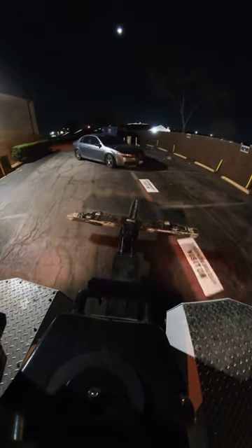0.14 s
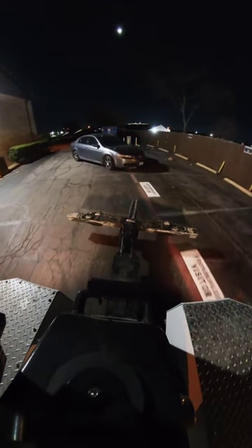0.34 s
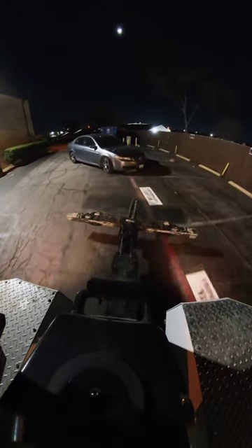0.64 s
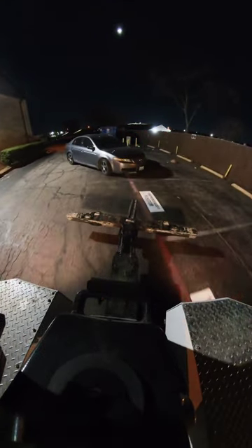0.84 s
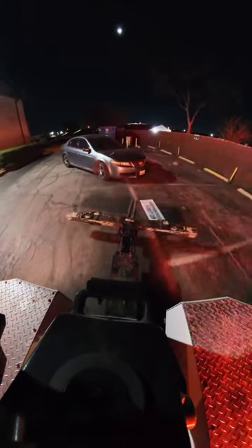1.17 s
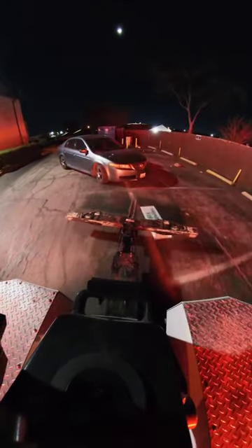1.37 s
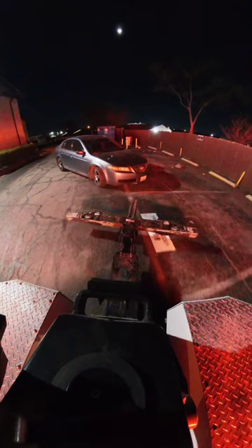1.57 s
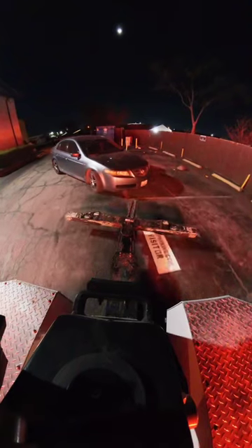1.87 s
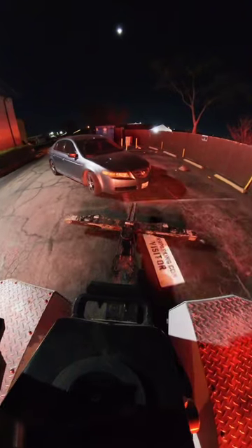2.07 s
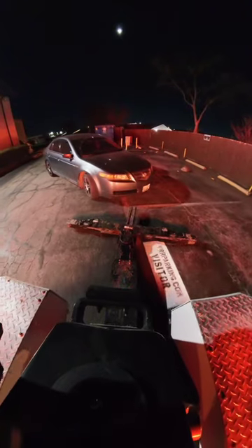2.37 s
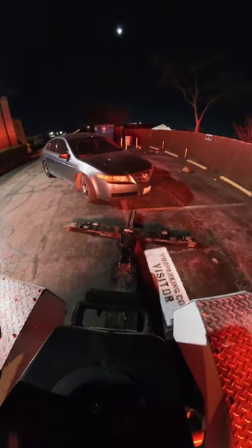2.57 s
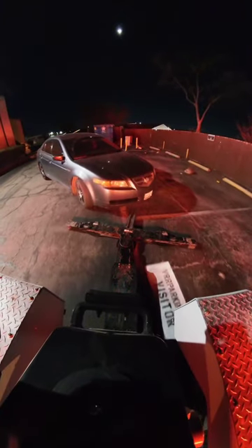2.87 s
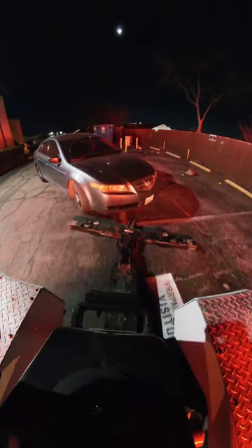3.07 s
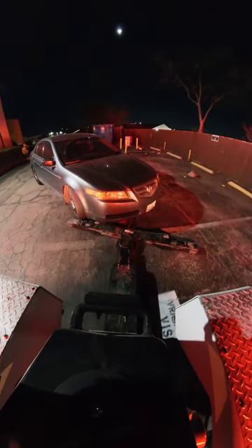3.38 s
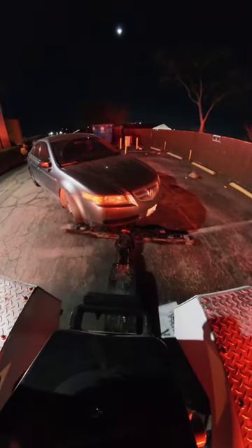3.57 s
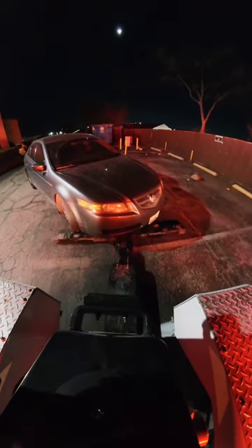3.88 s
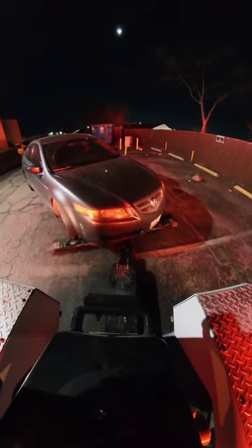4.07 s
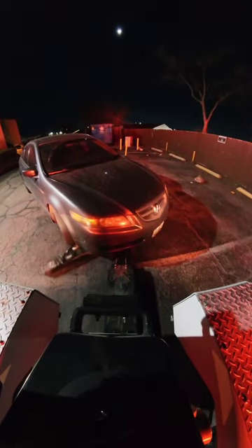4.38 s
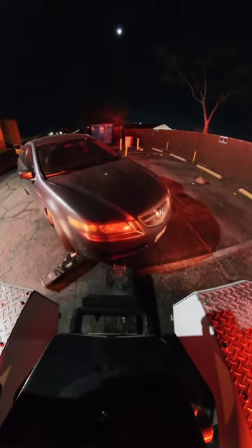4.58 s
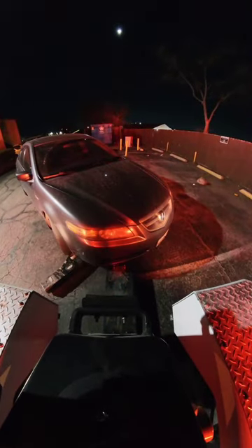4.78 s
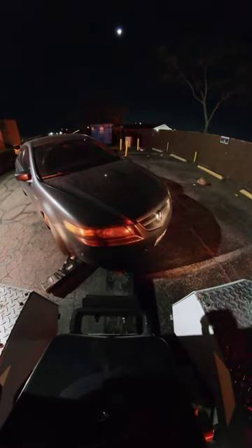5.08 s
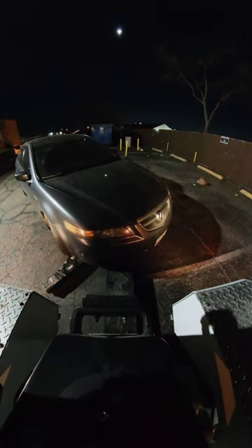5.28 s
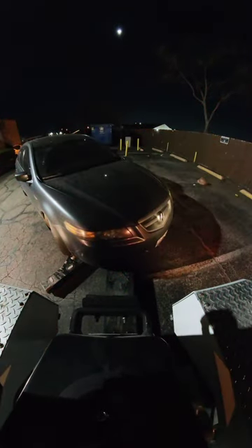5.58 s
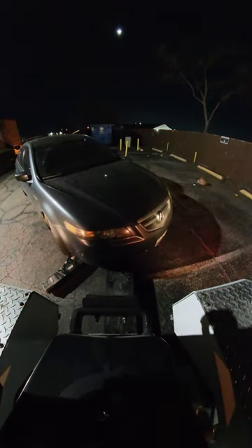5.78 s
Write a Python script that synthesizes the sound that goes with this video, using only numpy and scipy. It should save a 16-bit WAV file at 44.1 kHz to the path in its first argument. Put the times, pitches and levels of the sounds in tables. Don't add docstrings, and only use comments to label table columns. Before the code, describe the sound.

A diesel tow truck backs up in an outdoor lot at night, heard close from its rear deck, dull and nearly mono. From 0 to 1.9 s there is mostly a steady throbbing idle, low rumble and soft clatter, with tiny valve spits near 1.3 and 1.5 s. At 2.0 s a hydraulic pump bites in with a low buzzing drone, sagging then steadying, over faint scraping, until about 2.75 s, when a hard steel clunk rings out. From 2.9 to 3.7 s the engine lines sink and the arm scrapes, knocks and shakes the deck in low booms, with short hisses. Strong clanks land near 4.05, 4.55 and 4.95 s among grinding drags and spitting valves. Around 5.2 s a hiss with a thin whistle swells; at 5.58 s a clank and bright, loud hydraulic burst lead into a rising pump whine and stronger engine, ending abruptly at about 5.9 s.

```python
import sys
import numpy as np
from scipy import signal
from scipy.fft import rfft, irfft, next_fast_len
from scipy.io import wavfile
from scipy.ndimage import uniform_filter1d, minimum_filter1d, map_coordinates

SR = 44100
rng = np.random.default_rng(int(sys.argv[2]) if len(sys.argv) > 2 else 0)


def to_wav(s):
    ch = np.atleast_2d(s).T
    pcm = np.round(np.clip(ch, -1, 1) * 32767)
    wavfile.write(sys.argv[1], SR, pcm.astype(np.int16))


def undo_db(level):
    steps = np.asarray(level, float) / 20
    return 10 ** steps


N = 261513

# time_s,
# change_db
SWELLS = [(0, -1.5), (1.9, 1.5), (2.65, 2), (2.8, -3), (3.06, -3.5), (3.35, 6.5), (3.5, -4.5), (3.68, -6),
          (3.93, -2), (4.1, -12), (4.34, -4.5), (4.56, 3), (4.64, 1), (4.82, 9), (5.0, -12), (5.24, -2.5),
          (5.53, 3), (5.93, 0)]
# time_s, level_db
ROLL = [
    (0, -1),
    (2.7, -1.5),
    (2.85, -5.5),
    (5.4, -6.5),
    (5.6, 4.5),
    (5.93, 5),
]
# frequency_hz, density_db
MIDS = [(470, -19.5), (800, -4.5), (987, -5), (1180, -6), (1820, -13), (2060, -12.5), (2520, -16),
        (3270, -18), (3620, -27.5), (4500, -23.5), (5850, -40), (9900, -120)]


def unit(x):
    return x / np.sqrt(np.mean(x ** 2) + 1e-20)


def along(points, hz):
    f, v = np.transpose(points)
    return np.interp(np.log(hz + 1), np.log(f + 1), v)


def curves(rows):
    s, *columns = np.transpose(rows)
    return [np.interp(np.arange(N) / SR, s, column) for column in columns]


def gate(rows, edge_s=0.0028):
    t = np.arange(N) / SR
    inside_s = np.minimum(t - rows[0][0], rows[-1][0] - t)
    return np.clip(inside_s / edge_s + 1, 0, 1)


def wobble(rate):
    coarse = np.arange(0, N + 16, 16)
    knots = rng.standard_normal(int(N * rate / SR) + 4)
    smooth = map_coordinates(knots, [coarse * rate / SR])
    return unit(np.interp(np.arange(N), coarse, smooth))


def bursts(rows, rise_db_s, fall_db_s):
    t = np.arange(0, N + 64, 64) / SR
    s, held, db = np.transpose(rows)[..., None]
    early_s, late_s = np.maximum(s - t, 0), np.maximum(t - s - held, 0)
    level_db = db - rise_db_s * early_s - fall_db_s * late_s
    return np.interp(np.arange(N) / SR, t, np.linalg.norm(undo_db(level_db), axis=0))


def filtered(x, response):
    m = next_fast_len(len(x) + SR // 5)
    return irfft(rfft(x, m) * response(np.fft.rfftfreq(m, 1 / SR)), m)[:len(x)]


def resonances(modes):
    def response(f):
        total = 0
        for k, (centre, width, db) in enumerate(modes):
            damping = 1j * f * width
            total = total + (-1) ** k * undo_db(db) * damping / (centre * centre - f * f + damping)
        return total
    return response


def soft(hz, corner_hz):
    return 1 / (1 + 1j * hz / corner_hz) ** 3


def rush(spectrum, patchy_db):
    z = signal.stft(rng.standard_normal(N), nperseg=512)[2]
    field = uniform_filter1d(rng.standard_normal(z.shape), size=5, axis=0)
    field = uniform_filter1d(field, size=8, axis=1)
    x = signal.istft(z * undo_db(patchy_db * unit(field)), nperseg=512)[1][:N]
    return unit(filtered(x, lambda hz: undo_db(along(spectrum, hz))))


def tone(hz, order=1, drift=0):
    return np.sqrt(2) * np.sin(order * 2 * np.pi * np.cumsum(hz) / SR + drift)


def engine():
    # frequency_hz, density_db
    low_spectrum = [(13, -62.5), (22, -10.5), (81, -4), (130, -7.5), (212, -12.5), (360, -27), (408, -11),
                    (447, -25.5), (523, -30.5), (900, -35.5), (1170, -60), (1980, -120)]
    # frequency_hz, width_hz, level_db
    panel_modes = [(212, 1.1, -14.5), (265.2, 9.6, -3), (386, 18, -15.5), (416, 12, -6), (533, 71, -11.5)]
    # frequency_hz, width_hz, level_db
    casting_modes = [(1244, 310, 1.5), (1587, 260, 2.5), (3240, 83, -17), (4100, 110, -23.5),
                     (6840, 180, -23)]
    firing_hz = 35.3
    swell_db, = curves(SWELLS)
    engine_db, clatter_db = -39.5 + 0.95 * swell_db, -47 + 0.72 * swell_db

    firings = np.cumsum(firing_hz * (1 + 0.00643 * wobble(3))) / SR
    fires = np.flatnonzero(np.diff(np.floor(firings)))
    pulses = np.zeros(N)
    pulses[fires] = undo_db(0.5 * rng.standard_normal(N)[:len(fires)])
    exhaust = unit(filtered(pulses, lambda hz: undo_db(along(low_spectrum, hz)) * (hz > 90) * (hz < 450)))
    beat = 1 + 0.08 * np.cos(2 * np.pi * firings)
    roar = rush(low_spectrum, patchy_db=1.0) * beat
    low = undo_db(engine_db + 4.0 + 0.9 * wobble(12)) * (roar + 0.5 * exhaust)

    panels = unit(filtered(rng.standard_normal(N), resonances(panel_modes)))
    panel_db = -46.0 + 0.68 * np.minimum(curves(ROLL)[0], 0) + 3.0 * wobble(7)
    casting = unit(filtered(rng.standard_normal(N), resonances(casting_modes)))
    clatter = (rush(MIDS, patchy_db=1.85) + 0.5 * casting) * beat
    return low + undo_db(panel_db) * panels + undo_db(clatter_db - 2.0 + 0.26 * wobble(23)) * clatter


def hum():
    # frequency_hz, level_db
    order_lines = [(107, -44.5), (140.5, -44.5), (177, -49), (211, -51.5), (258.4, -54.5), (414, -47),
                   (532, -62.5)]
    lines = 0
    for hz, db in order_lines:
        breath = undo_db(db + 4.0 * wobble(3.7))
        lines = lines + breath * tone(np.full(N, hz), drift=0.6 * wobble(4.5))
    return undo_db(curves(ROLL)[0]) * lines


def pump():
    # time_s, pitch_hz, level_db, second_order_db
    drone = [
        (1.99, 166, -39.5, -0.5),
        (2.04, 156, -32.5, 2),
        (2.14, 146.5, -33, -1.5),
        (2.228, 148.1, -34, 1.5),
        (2.3, 152, -30.5, 3),
        (2.47, 153, -32, 4.5),
        (2.53, 151, -30, -9.5),
        (2.65, 152.6, -31, -0.5),
        (2.75, 154.3, -32, 2),
    ]
    # time_s, pitch_hz, level_db, second_order_db
    spin_up = [
        (5.659, 133.6, -38, 0),
        (5.714, 146.4, -30.5, -2),
        (5.815, 147.1, -37, 2.5),
        (5.856, 165.7, -32, 3),
        (5.9, 168.8, -33, 3.5),
        (5.93, 170.5, -31, 7.5),
    ]
    tooth_db = [2, -12.5, -12.5, -13.5, -23.5]
    lift_tooth_db = [-3.5, 1.5, 3, -3, 0]
    tank_hz, tank_width_hz, tank_db = 330, 37, 13
    total, shake = 0, 0.03 * wobble(30)
    hz, level_db, second_db = curves(drone + spin_up)
    drone_on, lift_on = gate(drone), gate(spin_up)
    for k, db in enumerate(tooth_db):
        order = k + 1
        lift_db = tank_db / (1 + ((order * hz - tank_hz) / tank_width_hz) ** 2)
        flutter_db = (2.2 if order > 2 else 0.8) * wobble(8.89)
        order_db = level_db + db + lift_tooth_db[k] * lift_on + lift_db + flutter_db
        order_db = order_db + second_db * (order == 2)
        total = total + undo_db(order_db) * tone(hz, order=order, drift=order * shake + np.pi / 2)
    return (drone_on + lift_on) * total


def valves():
    # start_s, held_s, flow_db
    openings = [(1.28, 0.022, -58), (1.465, 0.011, -51.5), (2.005, 0.023, -46), (2.15, 0.64, -64.5),
                (2.47, 0.021, -62), (2.805, 0.0072, -52), (2.985, 0.074, -61.5), (3.12, 0.38, -61.5),
                (3.58, 0.015, -54), (3.65, 0.15, -61), (3.9, 0.17, -58.5), (4.042, 0.0036, -45),
                (4.15, 0.01, -58.5), (4.255, 0.035, -54.5), (4.388, 0.011, -45.5), (4.43, 0.12, -59),
                (4.69, 0.21, -57.5), (4.962, 0.064, -47.5), (5.2, 0.031, -50), (5.217, 0.11, -44),
                (5.465, 0.053, -45), (5.577, 0.011, -37.5), (5.6, 0.13, -42.5), (5.78, .2, -40)]
    # frequency_hz, density_db
    jet_spectrum = [(530, -28), (900, 5), (1740, -3.5), (2090, -7), (2420, -1.5), (3200, -8.5),
                    (3740, -5.5), (5460, -6), (5900, -9), (6430, -6), (7730, -13.5), (8690, -26.5),
                    (9120, -20.5), (11900, -58), (20100, -120)]
    # frequency_hz, density_db
    edge_spectrum = [(6600, -30), (7300, -3), (8000, 0), (8600, -3), (9300, -4), (9700, -40)]
    # frequency_hz, width_hz, level_db
    hose_modes = [(1810, 85, -3.5), (2400, 53, -8.5), (3300, 570, -6), (3970, 47, -2.5), (5030, 80, -5.5),
                  (5820, 170, 8), (6270, 31, 0.5)]
    # start_s, held_s, level_db
    whistles = [(2.875, .085, -57), (3.685, .125, -55.5), (5.21, .125, -46), (5.608, .03, -36.5),
                (5.67, .11, -52), (5.68, .09, -61), (3.18, .13, -66), (4.25, .049, -58), (5.29, .04, -51),
                (5.49, .03, -57), (5.5, .034, -58), (5.68, .1, -52.5), (5.81, .04, -51), (3.11, .043, -63),
                (3.15, .09, -66), (2.2, .5, -66.5), (5.215, .1, -52), (5.65, .015, -51), (5.575, .03, -47),
                (5.7, .08, -52), (5.8, .13, -51), (5.84, .06, -53), (3.29, .04, -65), (3.3, .06, -64),
                (3.44, .025, -57), (3.72, .27, -58), (5.22, .04, -51), (5.76, .03, -50), (5.6, .05, -51),
                (4.54, .05, -63), (4.53, .03, -58), (4.975, .015, -54), (5.205, .02, -56), (5.82, .06, -58),
                (5.575, .02, -46), (5.505, .04, -56), (5.9, .03, -49), (5.47, .04, -59)]
    # pitch_hz, wander_hz
    gaps = [(4165, 37), (4160, 37), (5830, 95), (6760, 110), (7555, 65), (8450, 60), (6720, 60), (1830, 40),
            (3340, 70), (6400, 90), (4200, 70), (2400, 40), (4300, 60), (3450, 70), (4050, 70), (4950, 170),
            (6300, 110), (6850, 70), (4800, 120), (3650, 70), (5850, 90), (5000, 110), (5800, 50),
            (3250, 60), (2450, 90), (1600, 45), (3400, 120), (5050, 130), (7300, 120), (4020, 40),
            (3330, 50), (3400, 90), (4600, 70), (7550, 80), (5050, 110), (6450, 110), (5950, 130),
            (7400, 100)]
    # start_s, peak_db, colour_hz
    spits = [(1.2694, -57, 3230), (1.466, -38.5, 2900), (2.0123, -48, 3780), (3.0194, -51, 2800),
             (3.3902, -39, 2740), (4.147, -49, 5900), (4.7, -48, 2900), (4.2894, -47.5, 4320),
             (4.3964, -32.5, 5900), (5.3094, -47, 7750), (2.78, -37.5, 2800), (3.3, -44, 6200),
             (3.595, -47, 5900), (3.278, -43, 3300), (5.575, -29, 6100), (5.47, -37, 5100),
             (4.043, -34, 3440), (4.043, -45, 5200)]
    leak = undo_db(-63 + 0.53 * curves(SWELLS)[0] + 1.5 * wobble(12))
    opened = bursts(openings, rise_db_s=1403.5, fall_db_s=425.5)
    flow_db = 20 * np.log10(np.hypot(leak, opened))
    jet = rush(jet_spectrum, patchy_db=2.3)
    hose = unit(filtered(jet, resonances(hose_modes)))
    sputter_db = 1.3 * wobble(45)
    hiss = undo_db(flow_db + 0.2 + sputter_db) * (jet + 0.44 * hose)
    edge_db = -50.0 + 3.5 * (np.minimum(flow_db, -41) + 40.5)
    hiss = hiss + undo_db(edge_db) * rush(edge_spectrum, patchy_db=2.5)

    wander, flutter = wobble(480), wobble(130)
    for row, (hz, wander_hz) in zip(whistles, gaps):
        rise, fall = (520, 300) if wander_hz < 38 else (1100, 520)
        span = slice(round((row[0] - 0.06) * SR), round((row[0] + row[1] + 0.15) * SR))
        swell = bursts([row], rise, fall) * undo_db(2.7 * flutter)
        hiss[span] += swell[span] * tone(hz + wander_hz * wander[span])

    t = np.arange(SR // 20) / SR
    for s, db, hz in spits:
        puff = unit(filtered(rng.standard_normal(len(t)), resonances([(hz, 220, 0)])))
        decay = undo_db(db - 7.5 - 60 * t / 0.098) * (1 - np.exp(-t / 0.0012))
        hiss[round(s * SR):][:len(t)] += decay * puff
    return hiss


def boom():
    # start_s, peak_db, low_ring_hz, brightness_db, t60_s
    clunks = [(1.98, -25.5, 347, -14, 0.16), (2.328, -24, 404, -31, 0.13), (2.7623, 5, 504, -38, 0.012),
              (2.766, -13.5, 477, -19, 0.068), (2.801, -9.5, 361, -24, 0.085),
              (2.944, -31, 311, -36, 0.053), (3.278, -11.5, 473, -28, 0.09), (3.303, -19, 465, -36, 0.17),
              (3.389, -11.5, 344, -26, 0.057), (3.572, -17.5, 334, -38.5, 0.1),
              (3.71, -19.5, 395, -21, 0.095), (4.0398, -5.5, 473.6, -20, 0.13),
              (4.398, -21.5, 358, -12.5, 0.16), (4.55, -18, 340, -33, 0.083),
              (4.5672, -8, 502.4, -32, 0.15), (4.587, -28, 520, -34, 0.21), (4.763, -19.5, 386, -27, 0.071),
              (4.951, -6.5, 437, -26.5, 0.086), (5.464, -19, 328, -13, 0.16),
              (5.575, -12.5, 348, -9.5, 0.12), (2.809, -14, 499, -26, 0.17), (3.246, -19.5, 486, -20, 0.16),
              (3.33, -26, 450, -36, 0.11), (3.435, -20, 300, -19, 0.1), (2.792, -13, 404, -28, 0.052),
              (4.705, -19, 191, -20, 0.1), (4.87, -21, 404, -13, 0.038), (4.45, -20, 404, -21, 0.17)]
    # frequency_hz, width_hz, level_db
    arm_modes = [(186, 38, -7), (270, 34, -8.5), (311, 55, -6.5), (473, 23, -0.5), (679, 54, -6.5),
                 (932, 47, -14.5), (1440, 67, -22), (1670, 29, -14.5)]
    out, t = np.zeros(N + SR), np.arange(SR // 4) / SR
    for s, db, low_hz, bright_db, t60 in clunks:
        fall = undo_db(-60 * np.maximum(t - 0.14 * t60, 0) / t60) * (1 - np.exp(-t / 0.0017))
        changes = rng.standard_normal((len(arm_modes), 2))
        modes = [(hz * (1 + 0.021 * a), width, level + 2.4 * b)
                 for (hz, width, level), (a, b) in zip(arm_modes, changes)]
        crunch = filtered(rng.standard_normal(len(t)), resonances(modes))
        crunch = crunch / np.sqrt(np.sum((crunch * fall) ** 2) / np.sum(fall ** 2))

        high_hz = 677 * (1 + 0.49 * (modes[4][0] / arm_modes[4][0] - 1))
        ringing = np.sin(2 * np.pi * low_hz * t) + 0.19 * np.sin(2 * np.pi * high_hz * t)
        ringing = ringing + 0.27 * np.sin(2 * np.pi * 160 * t)
        blow = -np.sin(2 * np.pi * 520 * t) * undo_db(-60 * t / 0.005) * (1 - np.exp(-t / 0.0005))
        blow = blow * 2.7 * undo_db(min(0.4 * (db + 8), 0))
        scuff = unit(filtered(rng.standard_normal(len(t)), lambda f: undo_db(along(MIDS, f)) * (f > 1000)))
        struck = fall * (0.55 * crunch + 0.88 * ringing) + 2.24 * blow
        steel = filtered(struck, lambda f: soft(f, corner_hz=1700))
        out[round(s * SR):][:len(t)] += undo_db(db - 11) * (steel + undo_db(bright_db + 0.5) * fall * scuff)
    return out[:N]


def rings():
    # start_s, pitch_hz, level_db, t60_s
    struck_modes = [(2.7638, 480, -11, 0.069), (2.7634, 658, -17.5, 0.072), (2.7634, 915, -22.5, 0.053),
                    (2.803, 373, -13, .045), (2.7634, 1180, -36, 0.029), (2.804, 532, -20, 0.12),
                    (2.803, 740, -21, 0.088), (2.804, 1560, -41, .07), (3.27, 525, -26, .15),
                    (3.3, 338, -27, .2), (3.42, 290, -27, .12), (3.88, 454, -31.5, 0.17),
                    (3.94, 670, -38, .15), (3.82, 1140, -46, .12), (5.577, 1000, -31, .08),
                    (5.577, 1290, -28, .07), (5.577, 1560, -38, .07), (5.577, 1930, -38, 0.058),
                    (5.577, 2340, -35.5, 0.072), (5.605, 2020, -38, .08), (5.7, 722, -34, .3),
                    (3.39, 764, -29, 0.087), (3.572, 654, -38, .08), (3.71, 900, -36, 0.054),
                    (4.042, 673, -24, 0.23), (4.046, 1450, -35.5, .14), (4.05, 1624, -35, .12),
                    (4.041, 2350, -34, .03), (4.085, 450, -31, .07), (4.43, 1610, -42, 0.14),
                    (4.545, 342, -20, 0.19), (4.566, 672, -21.5, 0.2), (4.567, 903, -38, .09),
                    (4.568, 1424, -34, .09), (4.568, 1660, -35, 0.055), (4.76, 148, -24, 0.094),
                    (4.868, 1020, -33, 0.049), (4.951, 700, -30, 0.054), (4.951, 894, -30, 0.043),
                    (4.955, 1490, -36, 0.14), (4.96, 1825, -45, .07), (5.061, 479, -36, 0.42),
                    (5.275, 415, -30.5, 0.2), (5.23, 306, -31, 0.11), (5.465, 149, -24.5, .2),
                    (5.48, 541, -30.5, .2), (5.577, 698, -24.5, 0.11), (5.601, 225, -24, 0.31)]
    out, t, waver = np.zeros(N + SR), np.arange(SR // 4) / SR, wobble(60)
    for s, hz, db, t60 in struck_modes:
        decay = undo_db(db - 60 * t / t60) * (1 - np.exp(-t * hz / 1.7))
        out[round(s * SR):][:len(t)] += decay * np.sin(2 * np.pi * hz * t)
    return out[:N] * undo_db(1.1 * waver)


def scrape():
    # start_s, held_s, level_db
    strokes = [(2.1, 0.21, -38), (2.42, 0.06, -44), (2.56, 0.099, -39), (2.95, 0.29, -37.5),
               (3.24, 0.12, -33), (3.39, 0.062, -34), (3.5, 0.16, -39.5), (3.72, 0.038, -38),
               (3.87, 0.24, -40), (4.3, 0.035, -42.5), (4.45, 0.13, -37.5), (4.7, 0.12, -34.5),
               (5.04, 0.034, -44), (5.22, 0.1, -39), (5.48, .5, -34)]
    # frequency_hz, density_db
    grind_spectrum = [(120, -25.5), (200, -4), (231, -9), (344, 1.5), (448, -5), (579, -6), (759, -7),
                      (851, -20), (1100, -24), (1430, -60.5), (2420, -120)]
    grains = undo_db(1.6 * wobble(90))
    rest = undo_db(-48 + 0.48 * curves(SWELLS)[0])
    drag = np.hypot(rest, bursts(strokes, rise_db_s=200, fall_db_s=153.5))
    return drag * unit(grains * rush(grind_spectrum, patchy_db=0.5))


def deck():
    # time_s, level_db
    shaking = [(0, -39.5), (1.25, -35), (1.32, -54), (2.3, -37.5), (2.7, -32.5), (2.88, -44), (3.1, -49),
               (3.17, -21), (3.4, -28), (3.87, -31.5), (3.9, -24), (4.39, -28.5), (4.79, -26), (4.97, -18),
               (5.3, -39.5), (5.5, -36), (5.56, -21.5), (5.93, -31.5)]
    # start_s, level_db, t60_s
    jolts = [(0.2, -26.5, 0.42), (0.485, -49, 0.37), (1.58, -28.5, 0.29), (1.99, -28.5, 0.43),
             (2.05, -23, 0.32), (2.089, -24.5, 0.24), (2.773, -16, 0.23), (2.926, -24.5, 0.63),
             (2.999, -23, 0.15), (3.411, -20.5, 0.38), (3.472, -19.5, 0.36), (3.579, -16, 0.2),
             (3.65, -20, 0.51), (4.049, -15, 0.18), (4.4, -21, 0.57), (4.461, -19, 0.97),
             (4.821, -23.5, 0.48), (4.879, -18.5, 0.21), (5.82, -32.5, .3)]
    # start_s, held_s, level_db
    sways = [(0, 0.28, -42), (.49, 0, -41), (.65, .6, -45.5), (1.4, 0, -40), (1.75, 0.15, -51),
             (1.987, 0.13, -27.5), (2.1, 0.13, -35), (2.5, 0.091, -49), (2.81, 0.64, -30),
             (3.47, 0.0054, -25.5), (3.565, 0.029, -26.5), (3.62, 0.33, -31), (4.05, 0.0018, -28),
             (4.42, .35, -34), (4.79, 0.64, -31.5), (5.56, .25, -37), (5.82, 0.032, -32), (5.86, 0.1, -32)]
    upper_hz, lower_hz = 81.14, 58.74
    s, db, t60 = np.transpose(jolts)
    jolted = bursts(np.transpose([s, 0 * s, db]), 1500, 60 / t60[:, None])
    upper = np.hypot(undo_db(curves(shaking)[0]), jolted) * undo_db(1.6 * wobble(22.08))
    upper = upper * tone(np.full(N, upper_hz), drift=0.99 * wobble(5.7))
    swayed = bursts(sways, rise_db_s=700.5, fall_db_s=196.5)
    lower = np.hypot(undo_db(-57), swayed) * undo_db(2.5 * wobble(38))
    return upper + lower * tone(np.full(N, lower_hz), drift=0.19 * wobble(27))


def scene():
    mid = engine() + scrape() + deck() + pump() + valves() + boom() + hum() + rings()
    return np.array([mid, mid])


def unlike(mid):
    # frequency_hz, rarity_deviations
    rarity = [(2900, 9), (3100, -.6), (4500, -1.4), (5800, -.7), (6300, .9), (7400, 2.2), (7700, 9)]
    hz, _, z = signal.stft(mid, SR, nperseg=2048)
    bands = np.abs(z[:1024]).reshape(64, 16, -1)
    typical = np.median(bands, axis=1)
    luck = unit(uniform_filter1d(rng.standard_normal(typical.shape), size=3, axis=1))
    loud = np.log10(typical / np.median(typical, axis=1, keepdims=True))
    chosen = luck + 0.9 * loud > along(rarity, hz[8:1024:16])[:, None]
    noisy = bands.max(axis=1) < 3.4 * typical
    size = np.repeat(typical * (chosen & noisy), repeats=16, axis=0)
    size = np.vstack([size, size[-1:]])
    turn = np.exp(2j * np.pi * rng.random(z.shape))
    return undo_db(-3.5) * signal.istft(size * turn, SR, nperseg=2048)[1][:N]


def band_limit(x):
    return signal.sosfilt(signal.butter(12, 9450, fs=SR, output="sos"), x)


def record(dry):
    mid = filtered(dry[0], lambda hz: undo_db(along([(8300, -2), (9250, -15.5), (9600, -66.5)], hz)))
    needed = np.minimum(1, 0.41 / (np.abs(mid) + 1e-9)) ** 0.17
    mid = mid * uniform_filter1d(minimum_filter1d(needed, size=600), size=400)
    mid = mid * np.clip(np.arange(N, 0, -1) / 60, 0, 1)
    side = unlike(mid)
    return band_limit(np.array([mid + side, mid - side]))


dry = scene()
out = record(dry)
to_wav(out)
```